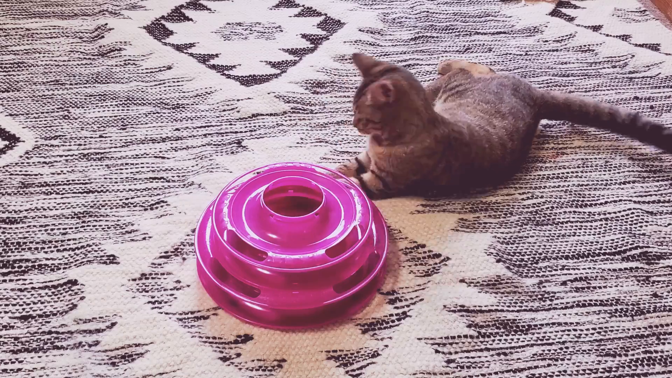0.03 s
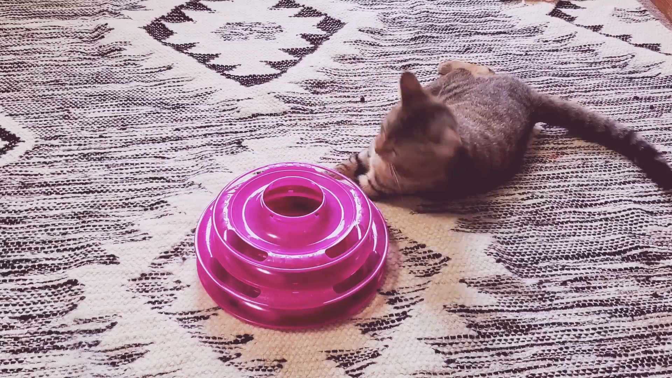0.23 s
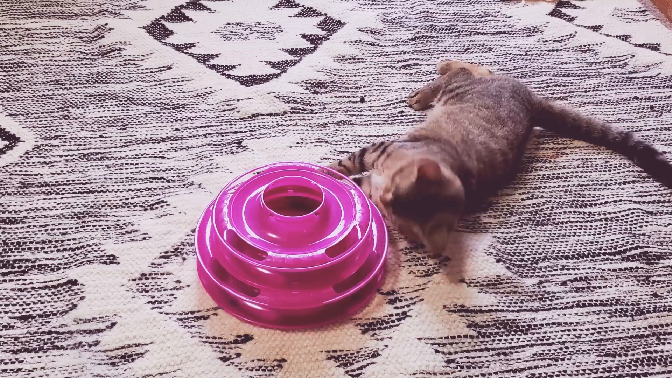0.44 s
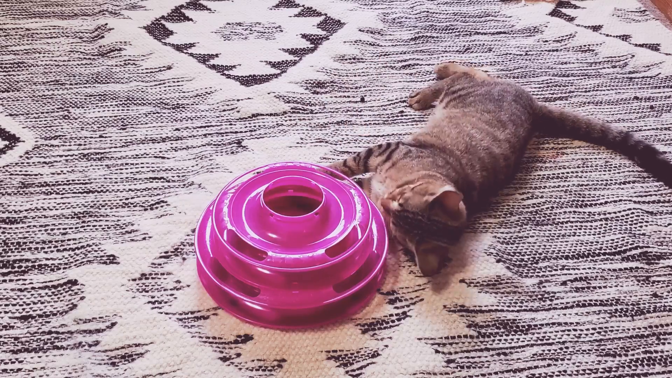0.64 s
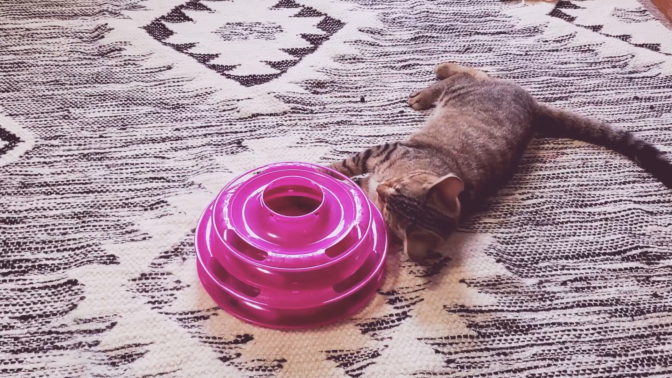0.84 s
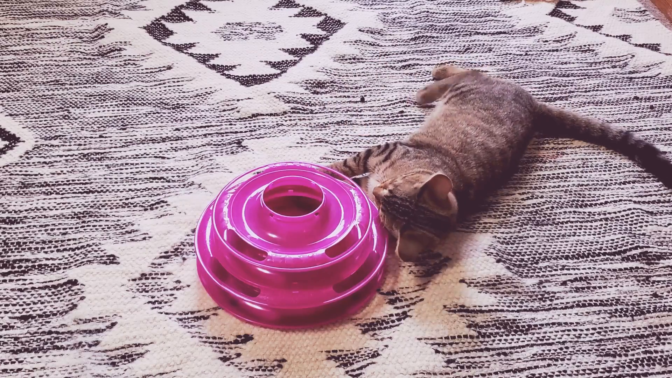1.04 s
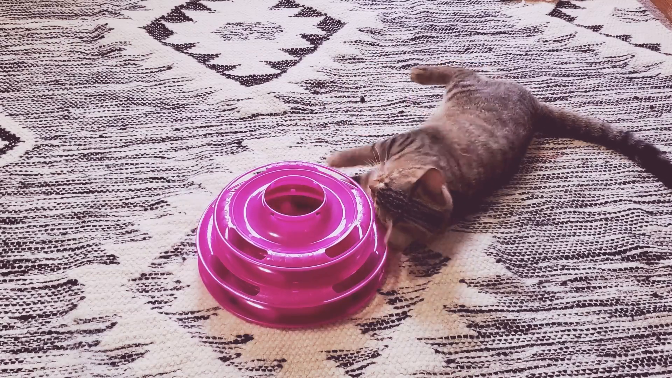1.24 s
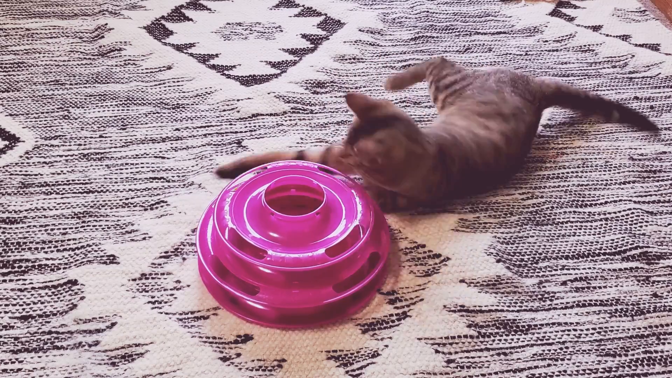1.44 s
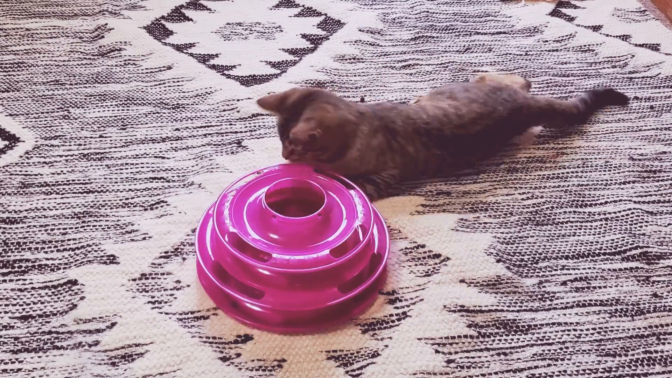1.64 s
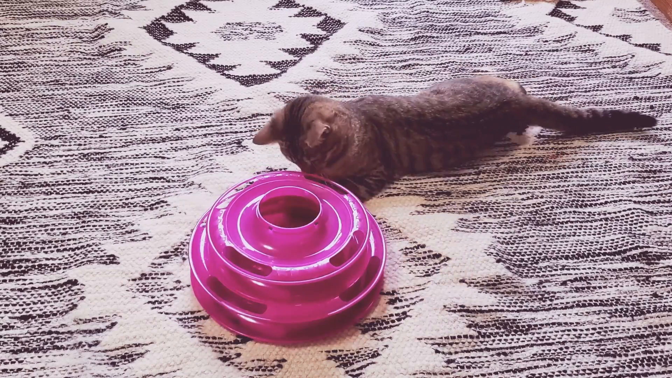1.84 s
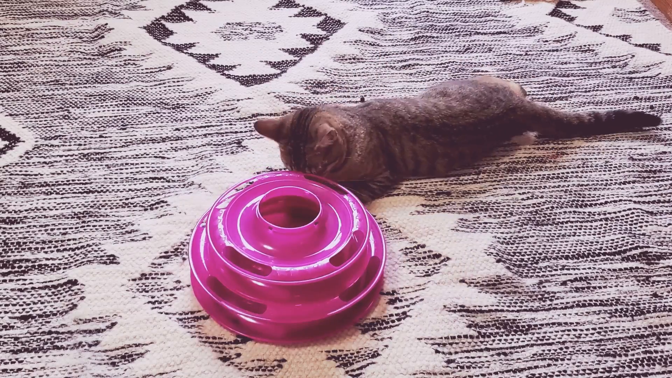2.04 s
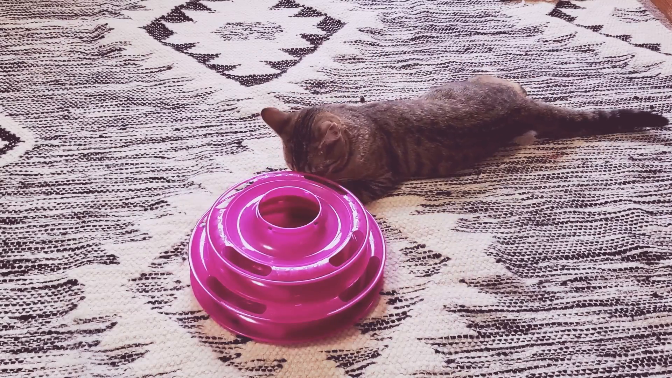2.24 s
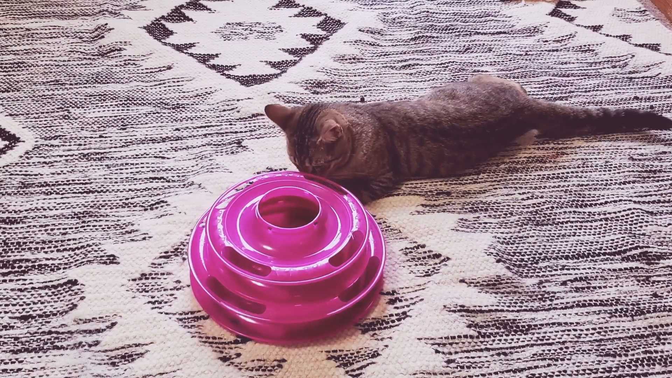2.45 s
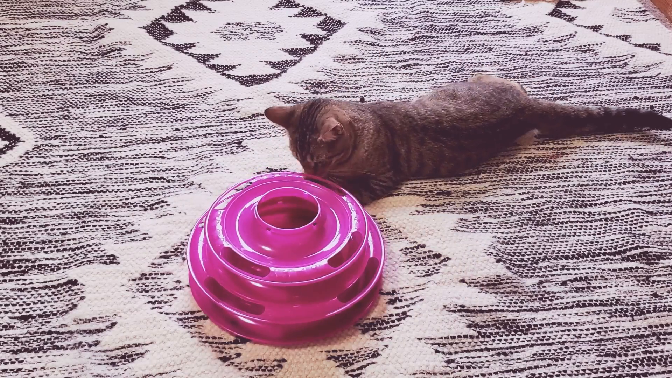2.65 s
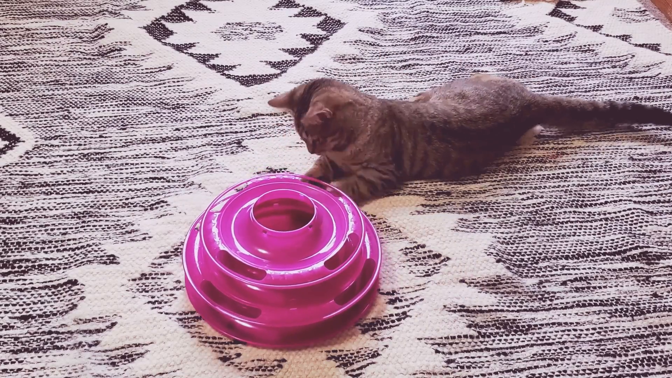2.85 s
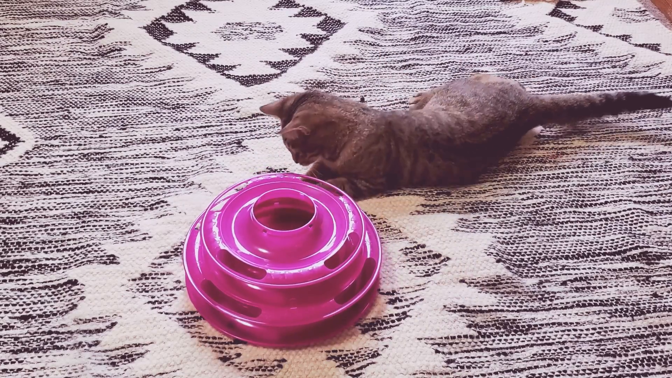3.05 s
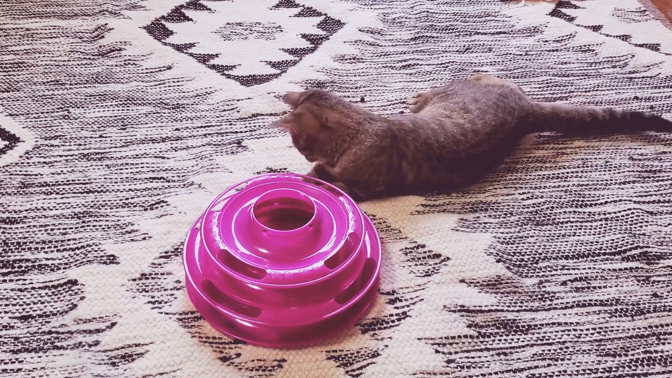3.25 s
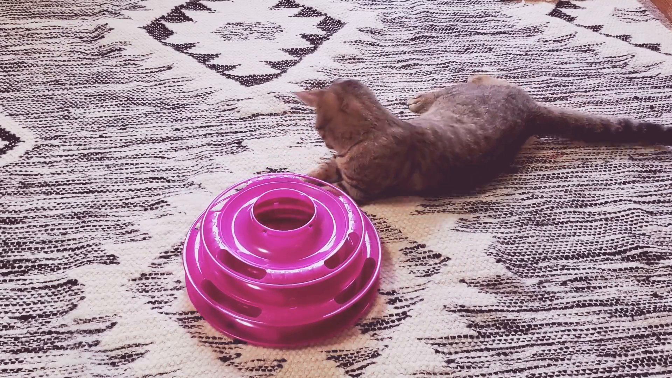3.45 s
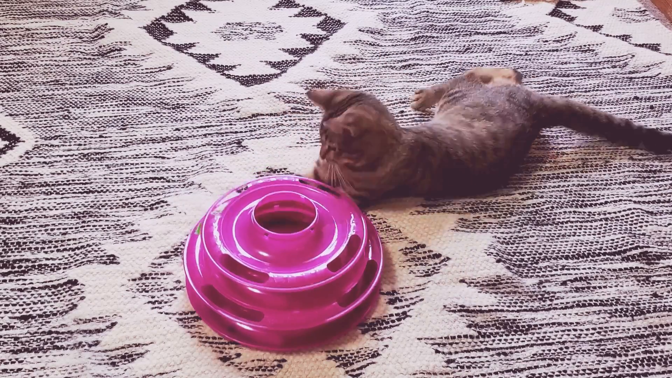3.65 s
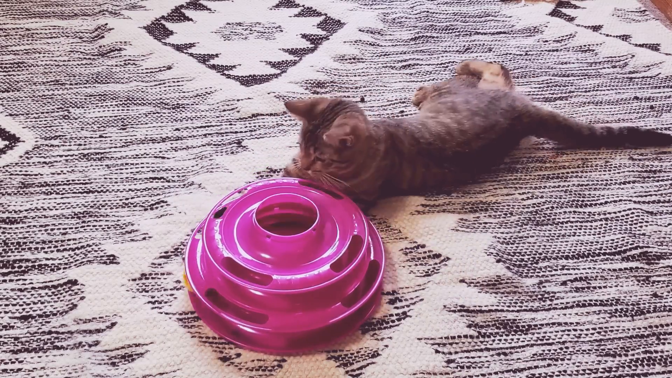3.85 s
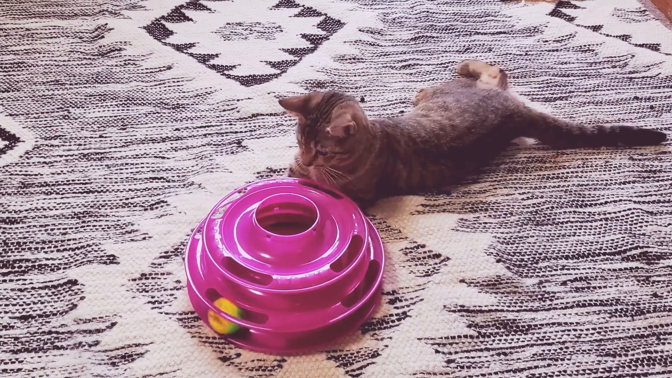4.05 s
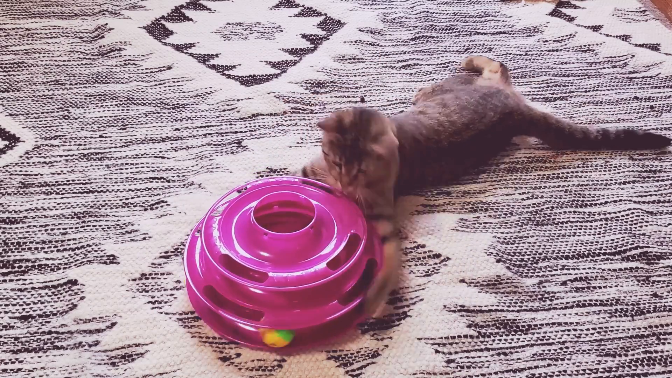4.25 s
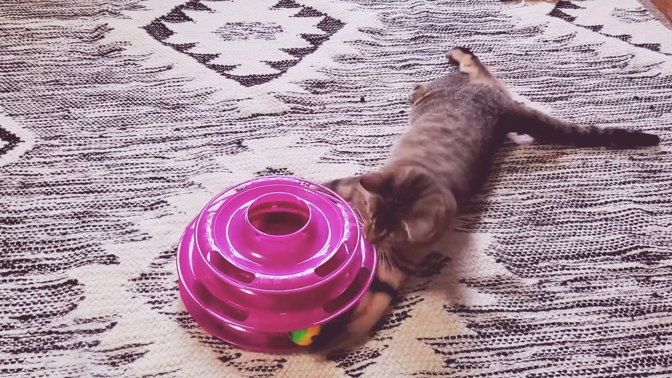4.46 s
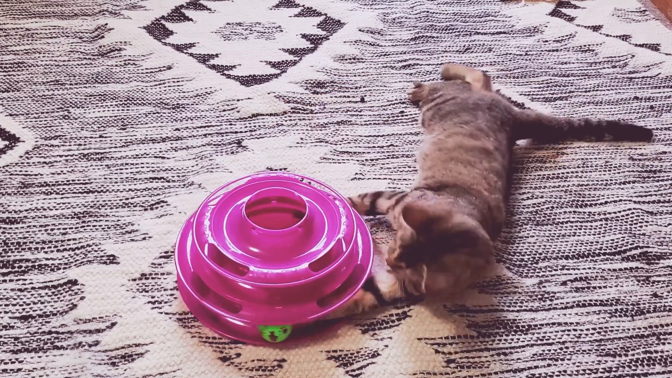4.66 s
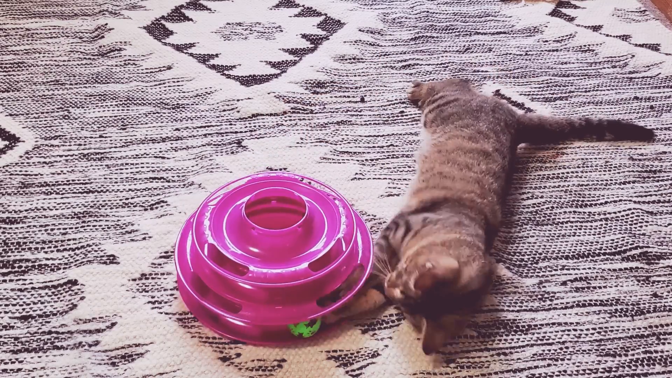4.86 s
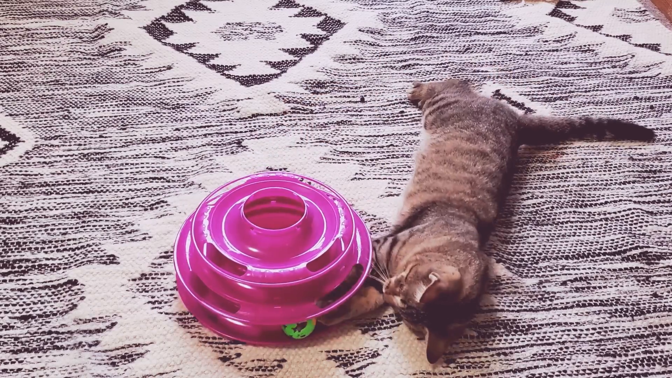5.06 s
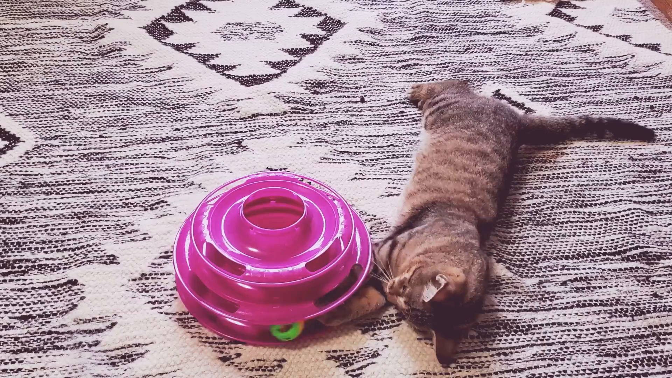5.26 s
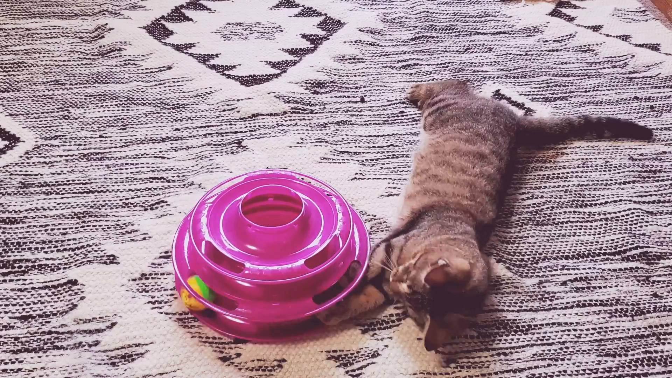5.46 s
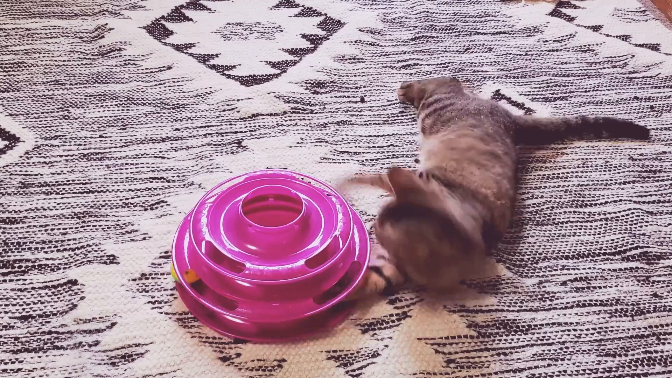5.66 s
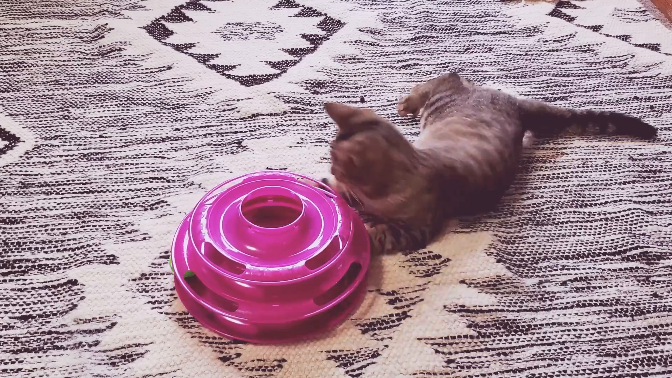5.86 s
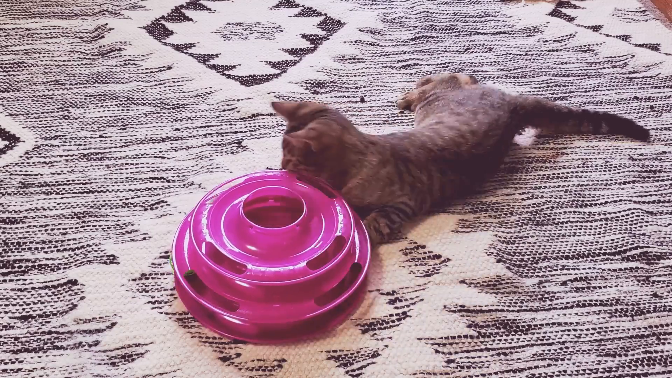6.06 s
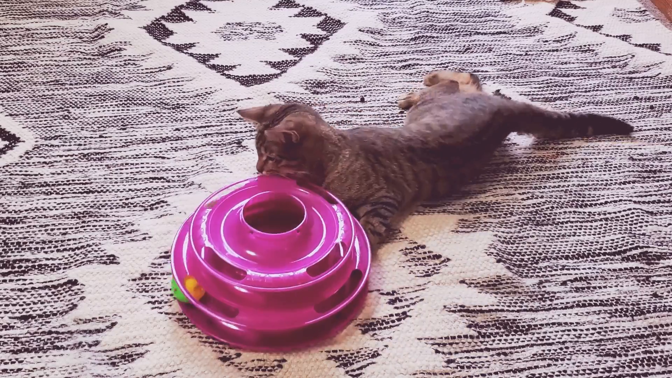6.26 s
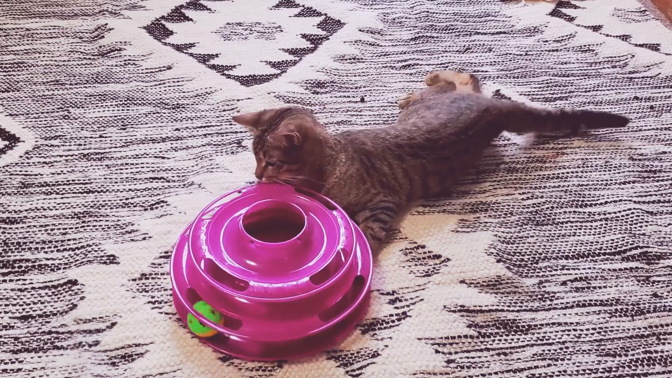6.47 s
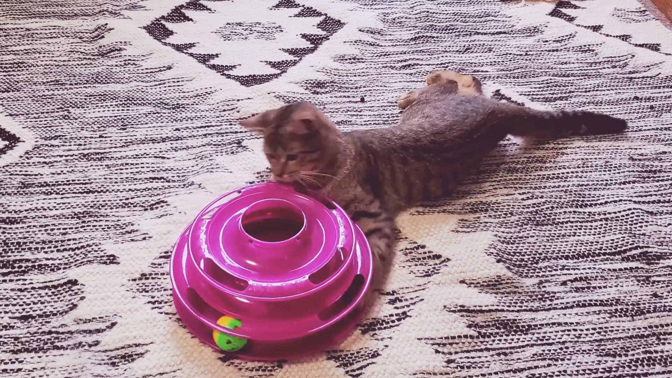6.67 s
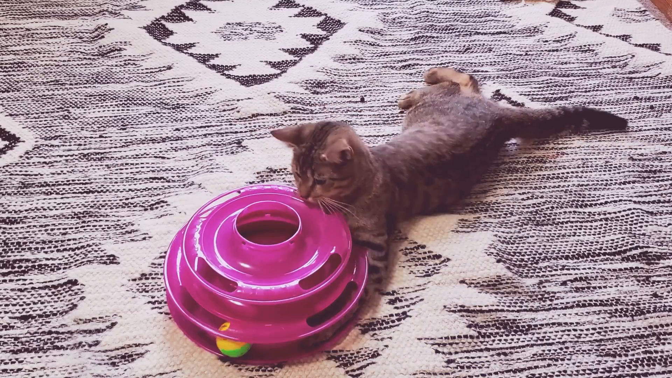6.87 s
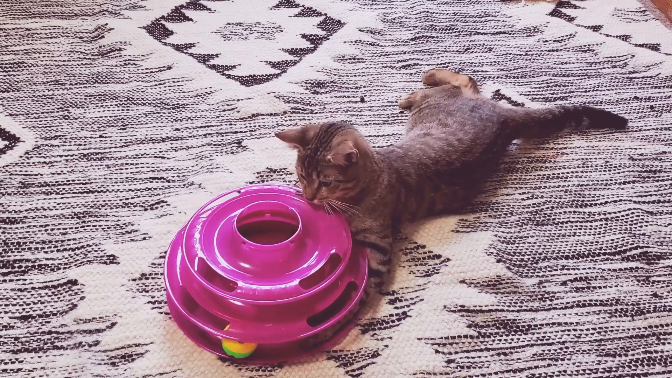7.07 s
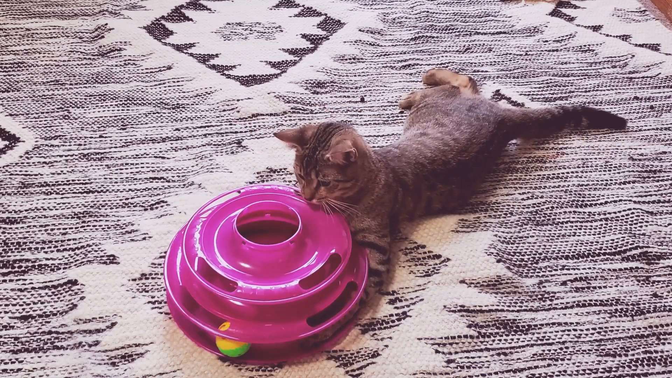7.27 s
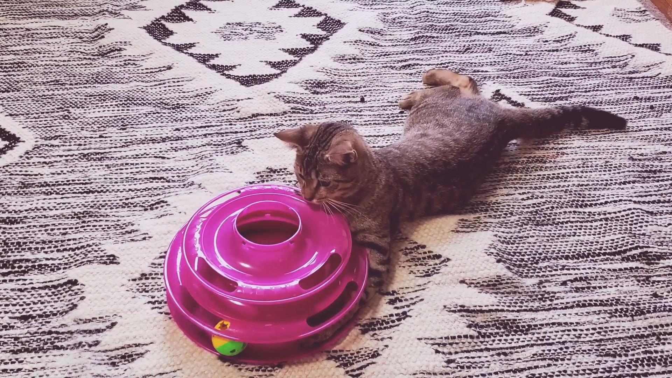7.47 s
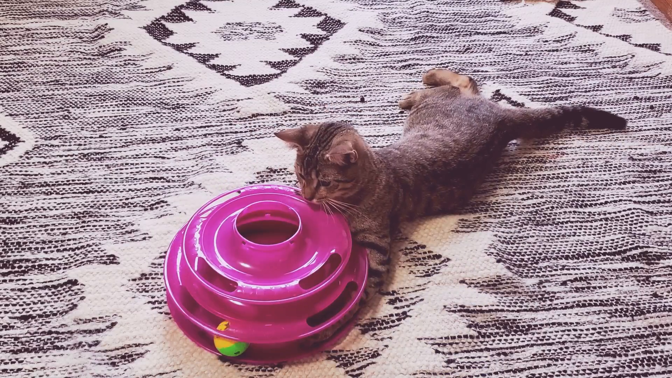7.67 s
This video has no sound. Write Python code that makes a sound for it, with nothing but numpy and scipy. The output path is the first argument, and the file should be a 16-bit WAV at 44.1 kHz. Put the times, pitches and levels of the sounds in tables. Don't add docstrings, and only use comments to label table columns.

```python
import sys
import numpy as np
from scipy import signal
from scipy.fft import rfft, irfft, next_fast_len
from scipy.io import wavfile
from scipy.ndimage import uniform_filter1d, map_coordinates

SR = 44100
rng = np.random.default_rng(int(sys.argv[2]) if len(sys.argv) > 2 else 0)


def gain_from_decibels(decibels):
    exponent = np.asarray(decibels, float) / 20
    return 10 ** exponent


def to_wav(sig):
    pcm = np.clip(np.atleast_2d(sig), -1, 1) * 32767
    pcm = np.round(pcm).astype(np.int16)
    wavfile.write(sys.argv[1], SR, pcm.T)


N = 340452

# (pitch_hz, width_hz, level_db)
TRACK_TONES = [(1400, 200, -8.5), (1820, 730, -13.5), (2580, 40, -5), (2790, 260, -11), (2950, 38, -7),
               (3376, 90, -6.5)]
# (pitch_hz, width_hz, level_db)
TOWER_TONES = [(261, 22, -7.5), (358, 20, -8.5), (428.7, 29, 12.5), (515, 310, 0), (605.5, 23, -1)]
# (pitch_hz,
# level_db)
SHELL_COLOUR = [(2500, -35.5), (3900, -5), (4900, -13.5), (5400, -12.5), (5800, -3.5), (6300, -8.5),
                (7000, -3), (8000, -8.5), (8500, -10.5), (9500, -3), (11200, 0.5), (14600, 2.5),
                (16500, -4)]
# (pitch_hz, width_hz, level_db)
SHELL_TONES = [(5110, 30, 3.5), (6760, 53, 4.5), (7070, 100, 5), (7910, 120, 2.5), (9650, 47, 3.5),
               (10800, 72, 6), (12300, 85, 4)]
# (top_speed_s, low_fizz_db, time_to_stop_s, high_over_low_fizz_db)
RIM_PUSHES = [(.03, -58.5, 0.13, 2), (.17, -74, 0.055, -2), (.215, -70.5, 0.1, 3), (1.245, -59, 0.26, 3.5),
              (1.365, -58, 0.094, 1.5), (1.49, -58.5, 0.09, -0.5), (1.665, -53, 0.27, 1),
              (1.555, -51, 0.079, 1), (1.74, -55, 0.26, -0.5), (2.0, -63, 0.18, 0.5),
              (2.775, -73, 0.12, -2), (2.91, -58, 0.25, -1), (3.0, -70, 0.11, -5), (3.185, -63, 0.11, 4),
              (3.33, -83.5, 0.11, 6), (3.39, -68, 0.12, 1.5), (3.45, -59.5, 0.33, 0), (3.55, -67, 0.3, 11),
              (3.635, -57, 0.18, 3), (3.77, -51.5, 0.21, 4), (3.935, -57.5, 0.61, -1.5),
              (4.06, -53.5, 0.25, 2.5), (4.17, -55, 0.75, 2.5), (4.26, -53.5, 0.55, 3),
              (4.535, -49.5, 0.24, 9.5), (4.68, -54.5, 0.54, 4.5), (4.8, -78.5, 0.48, 17.5),
              (4.94, -60.5, 0.18, 3), (5.13, -74.5, 1, 11), (5.36, -53.5, 0.15, 5.5), (5.52, -56, 0.39, 10),
              (5.71, -62, 0.22, 3.5), (5.795, -57, 0.084, 4), (5.89, -60, 0.19, 5), (5.971, -74.5, 0.3, -1),
              (6.215, -58.5, 0.18, 2.5), (6.33, -62, 0.78, 5), (6.59, -58.5, 0.31, 3),
              (6.77, -64, 0.25, 11), (6.89, -59.5, 0.13, 5)]


def evened(x):
    return x / np.sqrt(np.mean(x ** 2) + 1e-20)


def peaked(x):
    return x / np.abs(x).max()


def read(points, hz):
    f, value = np.transpose(points)
    return np.interp(np.log(hz + 1), np.log(f + 1), value)


def add(mix, s, sound):
    part = mix[round(s * SR):][:len(sound)]
    part += sound[:len(part)]


def coloured(x, gain):
    size = next_fast_len(x.shape[-1])
    spectrum = rfft(x, size) * gain(np.fft.rfftfreq(size, 1 / SR))
    return irfft(spectrum, size)[..., :x.shape[-1]]


def body(x, modes):
    out = 0
    for hz, width, db in modes:
        pole = np.exp((2j * np.pi * hz - np.pi * width) / SR)
        out = out + gain_from_decibels(db) * 2 * signal.lfilter([1 - abs(pole)], [1, -pole], x).real
    return out


def gliding(x, hz, width):
    turn, r = np.exp(2j * np.pi * np.cumsum(hz) / SR), np.exp(-np.pi * width / SR)
    return 2 * (turn * signal.lfilter([1 - r], [1, -r], x / turn)).real


def bumps(per_s, spread_db):
    size = gain_from_decibels(spread_db * np.minimum(rng.exponential(1, N), 4)) * rng.choice([-1, 1], N)
    return size * (rng.random(N) < per_s / SR)


def drift(seconds, shape):
    size = max(round(seconds * SR), 2)
    smooth = uniform_filter1d(rng.standard_normal(shape), size)
    return evened(uniform_filter1d(smooth, size))


def patchy(x, spread_db):
    z = signal.stft(x, nperseg=256)[2]
    field = uniform_filter1d(rng.standard_normal(z.shape), size=4, axis=0)
    field = uniform_filter1d(field, size=14, axis=1)
    return evened(signal.istft(z * gain_from_decibels(spread_db * evened(field)), nperseg=256)[1][:N])


def follow(pushes, second=False):
    speed_up_s, slowing = .05, 1.7
    t = np.arange(0, N / SR + .01, .002)
    s, db, coast_s, over_db = np.transpose(pushes)[:, :, None]
    speed = np.clip(1 - np.maximum(t - s, 0) / coast_s, 0, 1)
    rise_db = -20 * np.minimum(np.maximum(s - t, 0) / speed_up_s, 3) ** 2
    each = gain_from_decibels(db + second * over_db + rise_db) * speed ** slowing
    return np.interp(np.arange(N) / SR, t, np.sqrt((each ** 2).sum(0)))


def panel_hz(t):
    # (start_s, pitch_hz)
    panels = [
        [(0.0, 2880), (0.214, 2910), (0.3, 2690)],
        [(1.2, 3020), (1.384, 2600), (1.504, 2930), (1.57, 2700), (1.64, 2870)],
        [(1.66, 2650), (1.708, 2630), (1.734, 2960), (1.85, 2620), (2.0, 3000), (2.05, 2690), (2.1, 2730)],
        [(2.75, 2780), (2.874, 2720), (2.984, 2700), (3.022, 2930), (3.126, 2790), (3.146, 3020), (3.174, 2650),
         (3.25, 2740)],
        [(3.43, 2980), (3.61, 2950), (3.72, 2700)],
        [(3.74, 2800), (3.882, 2830), (3.9, 2570), (4.082, 2644), (4.108, 2950), (4.148, 3120), (4.18, 2570),
         (4.25, 2890)],
        [(4.27, 2630), (4.35, 2960), (4.404, 2720), (4.446, 2720), (4.694, 3000), (4.754, 2720), (4.866, 2800),
         (5.0, 2700)],
        [(5.33, 2730), (5.4, 3040), (5.52, 2790), (5.544, 2950), (5.602, 2740), (5.702, 2860), (5.76, 2960)],
        [(6.18, 2750), (6.224, 2650), (6.306, 2660), (6.352, 2570), (6.448, 2960), (6.56, 3020)],
        [(6.58, 3040), (6.728, 2780), (6.756, 2580), (6.95, 2820)],
    ]
    return np.interp(t, *np.concatenate(panels).T)


def hush():
    # (pitch_hz, level_db_per_hz)
    hush_colour = [(15, -33.5), (38, -3), (66, 2.5), (124, -16), (250, -18), (330, -22.5), (900, -32),
                   (1500, -27.5), (3000, -34), (4800, -41.5), (8400, -53.5), (10000, -50), (15500, -39)]
    # (pitch_hz, likeness)
    likeness = [(30, 4.5), (60, 0.88), (240, 0.7), (950, -7), (3770, 0.6), (15000, -13)]
    # (pitch_hz, width_hz, level_db)
    house_drones = [(197.9, 17, -86), (261, 23, -88), (550, 36, -105), (795, 30, -100), (1325, 25, -98)]
    a, b = rng.standard_normal((2, N))
    same = lambda f: np.clip(read(likeness, f), 0, 1)
    right = coloured(a, same) + coloured(b, lambda f: np.sqrt(1 - same(f) ** 2))
    bed = evened(coloured(np.array([a, right]), lambda f: gain_from_decibels(read(hush_colour, f))))
    swell = gain_from_decibels(1.3 * drift(.1, N))
    drones = 0
    for hz, width, db in house_drones:
        drones = drones + gain_from_decibels(db + 6.3 * drift(.042, N)) * evened(body(a, [(hz, width, 0)]))
    t = np.arange(N) / SR
    # (level_db, middle_s, half_length_s, pitch_hz, width_hz)
    for db, middle, half, hz, width in ((-79, .5, .37, 555, 9.2), (-80, 7.22, .11, 1340, 38),
                                        (-83, 6.02, .08, 1505, 31)):
        drones = drones + gain_from_decibels(db - 20 * ((t - middle) / half) ** 4) * evened(body(a, [(hz, width, 0)]))
    return gain_from_decibels(-63) * swell * bed + drones


def contacts():
    # (start_s, wall_clack_db, clack_pitch_hz, shell_tick_db)
    clacks = [(6.447, -58, 1580, -44), (1.6547, -26.5, 2570, -29), (1.7261, -24.5, 1680, -38),
              (1.7429, -29.5, 1870, -32), (1.8632, -51.5, 1400, -58), (1.956, -40.5, 1770, -42.5),
              (2.022, -41, 1970, -60), (2.047, -49.5, 2110, -62), (2.1814, -39.5, 2880, -60),
              (1.958, -47, 2950, -42), (2.234, -48.5, 3080, -64), (2.277, -57.5, 1820, -70),
              (3.4415, -45, 1950, -48), (3.6213, -24, 2940, -28), (4.197, -39, 1230, -37),
              (4.3028, -36, 1770, -28), (4.3437, -47, 1920, -39), (4.4627, -26.5, 1700, -26.5),
              (4.5067, -23.5, 2540, -22.5), (4.5355, -24.5, 2100, -23.5), (5.525, -51, 1400, -55.5),
              (5.7728, -16.5, 2660, -20), (6.0865, -58, 2550, -67), (6.1739, -37, 1360, -30),
              (6.2798, -42, 1400, -42.5), (6.3107, -36.5, 1470, -39), (6.5628, -32, 1710, -38.5),
              (6.5734, -39.5, 2270, -35), (6.752, -54.5, 1440, -42.5), (7.2123, -50, 1830, -76),
              (7.34, -51.5, 1810, -55.5), (7.644, -60, 1675, -68.5)]
    # (start_s, wall_clack_db, shell_tick_db)
    rattles = [(.0164, -57, -44), (1.2028, -42, -32), (1.2517, -46, -38), (1.288, -49, -32),
               (1.3134, -49, -32), (1.3584, -40.5, -36.5), (1.4613, -46.5, -42), (1.5344, -40, -32),
               (1.5603, -53, -45), (1.9986, -35, -38.5), (2.7462, -72, -49), (2.9128, -41, -50),
               (2.9856, -45.5, -39.5), (3.5177, -43.5, -37), (3.568, -41, -30), (3.6503, -25.5, -31),
               (3.8138, -45, -29), (3.8501, -44, -36.5), (3.9863, -44, -26), (4.14, -58, -31.5),
               (4.2377, -44, -27), (4.4202, -33, -36.5), (4.6503, -40.5, -32), (4.7035, -46, -35),
               (5.2168, -47.5, -41.5), (5.5834, -47, -34.5), (6.38, -41.5, -52), (6.778, -48, -38),
               (6.8057, -44, -38)]
    # (start_s, wall_clack_db, shell_tick_db)
    skips = [(1.782, -40, -49.5), (1.978, -45, -71), (2.8709, -42.5, -58), (3.1452, -51.5, -58.5),
             (3.1807, -45, -53), (3.7382, -29.5, -53.5), (3.9214, -67, -44), (3.9403, -38.5, -44.5),
             (4.0272, -37.5, -43.5), (4.0545, -41, -43), (4.0832, -35.5, -44.5), (4.1566, -68, -48),
             (4.2747, -34, -39.5), (4.5819, -27, -44.5), (4.616, -39, -57.5), (4.6782, -43, -46),
             (4.7491, -52, -56), (4.9828, -43, -61), (5.3324, -39, -38), (5.3586, -67, -43.5),
             (5.5001, -47.5, -45.5), (5.5267, -67, -41.5), (5.5575, -40, -44), (5.6193, -48, -44),
             (5.9469, -62, -53), (6.5316, -50, -46), (6.609, -40, -63), (6.624, -41, -46.5),
             (6.8573, -48.5, -45.5), (6.921, -54, -51.5)]
    # (start_s, high_tick_db, wall_clack_db)
    bounces = [(0.1538, -69, -67), (0.2076, -62, -60), (1.2314, -46, -60), (1.308, -42, -51),
               (1.4857, -39, -45), (1.504, -32, -62), (1.571, -40, -43.5), (1.7666, -37, -55),
               (1.797, -47, -36), (1.8332, -44, -43), (2.9187, -35.5, -67), (3.0152, -52, -44),
               (3.063, -60, -42), (3.1632, -50.5, -66), (3.4187, -45, -52), (3.5384, -44, -42),
               (3.5994, -34.5, -82), (3.626, -29.5, -63), (3.6345, -34, -43), (3.729, -37.5, -37),
               (3.792, -31.5, -63), (3.8282, -28, -46), (3.8618, -26, -55), (4.1025, -27.5, -54),
               (4.2198, -29, -61), (4.4426, -36, -39.5), (4.5503, -15.5, -59), (4.607, -33.5, -41),
               (4.6638, -28.5, -38), (4.724, -49, -42), (4.7378, -34, -42), (4.782, -34, -52),
               (4.8318, -37, -64), (4.929, -63, -57), (4.9437, -39, -70), (4.9564, -50, -62),
               (5.1657, -50, -66), (5.68, -55, -68), (4.8127, -55, -45.5), (5.125, -64, -60),
               (5.2017, -62, -59.5), (5.3085, -66, -64), (5.628, -52.5, -60), (5.669, -54.5, -62),
               (3.37, -58, -61), (1.918, -62, -61), (2.077, -58, -58), (6.341, -40.5, -50),
               (6.723, -41, -66), (6.3026, -45, -65), (6.43, -53.5, -55), (6.4708, -27, -55),
               (6.506, -32.5, -74), (6.6762, -50, -75), (1.649, -32.5, -44.5), (2.96, -42, -67),
               (3.042, -53, -64), (3.193, -49, -58), (1.348, -48, -48), (4.411, -50, -55), (4, -38.5, -54),
               (5.427, -44, -52)]
    rows = [(s, db, hz, tick, tick - 4) for s, db, hz, tick in clacks]
    light = [(s, db, high - 8) for s, high, db in bounces]
    for table, high_over_db in ((rattles, -8), (skips, 7.5), (light, .5)):
        spread = 1 + .03 * rng.uniform(-0.39, 1, len(table))
        pitches = panel_hz(np.transpose(table)[0]) * spread
        rows += [(s, db, hz, tick, tick + high_over_db) for (s, db, tick), hz in zip(table, pitches)]
    return rows


def shell_tick(noise, spot, t, low_db, high_db):
    fade = gain_from_decibels(-60 * t / .0092) + .066 * gain_from_decibels(-60 * t / .034)
    crack = noise * (1 - np.exp(-t / .0018)) ** 2 * fade
    patches = body(crack, [(f, 900, 6) for f in 4000 + 11000 * spot])
    crack = crack + patches + gain_from_decibels(-2) * body(crack, SHELL_TONES)
    lean_db = lambda f: read([(7800, low_db), (8800, high_db)], f)
    return coloured(peaked(crack), lambda f: gain_from_decibels(read(SHELL_COLOUR, f) + lean_db(f) + 11))


def wall_clack(noise, t, db, hz):
    soft = np.interp(db, [-50, -22], [2.4, 1.1])
    blow = noise * (1 - np.exp(-t / .0008 / soft)) ** 2 * gain_from_decibels(-60 * t / .006 / soft)
    ring = body(blow, [(hz, 520, 0)]) + gain_from_decibels(7) * body(blow, TRACK_TONES)
    clack = body(ring, [(hz, 3200 / soft ** 1.5, 0)])
    clack = clack + body(blow, [(hz * 1.55, 900, -8 - 1.2 * soft)])
    clack = signal.lfilter(*signal.butter(4, .6 * hz, "high", fs=SR), clack)
    return gain_from_decibels(db + 4) * peaked(clack)


def knocks():
    out, t = np.zeros(N), np.arange(3072) / SR
    rows = contacts()
    noise, spots = rng.standard_normal((len(rows), 2, len(t))), rng.random((len(rows), 3))
    for (s, clack_db, hz, low_db, high_db), (a, b), spot in zip(rows, noise, spots):
        tick = shell_tick(a, spot, t, low_db, high_db)
        add(out, s - .0009, tick + wall_clack(b, t, clack_db, hz))
    return out


def rolling():
    # (top_speed_s, ring_db, time_to_stop_s, tower_drone_over_ring_db)
    track_pushes = [(.035, -59, 0.12, -10), (.17, -62.5, 0.065, -13), (.215, -68, .07, -7.5),
                    (1.241, -56.5, 0.19, 1), (1.362, -54.5, 0.14, -22), (1.555, -41.5, 0.051, -15.5),
                    (1.665, -50, 0.24, -5.5), (1.74, -52.5, 0.75, -27), (2.0, -63, 0.11, -6),
                    (2.77, -63.5, 0.042, -10), (2.865, -57.5, .03, -10), (2.9, -64, 0.2, 0.5),
                    (3.03, -59, 0.3, -16), (3.185, -61.5, 0.059, -8.5), (3.4, -69.5, 0.11, -12),
                    (3.47, -48, 0.2, -9), (3.545, -46.5, 0.14, -17), (3.64, -38.5, 0.061, -12.5),
                    (3.765, -44, 0.18, -12), (3.9, -53, 1, -0.5), (4.06, -46.5, 0.17, -17),
                    (4.23, -47.5, 0.35, -13), (4.305, -56, 0.26, -21), (4.535, -38.5, 0.12, -11),
                    (4.7, -62, 0.31, -2), (4.815, -68.5, 0.28, 0), (4.99, -71, 0.054, -0.5),
                    (5.24, -69, 0.29, -1), (5.365, -51.5, 0.55, -7), (5.521, -52, 0.17, -1.5),
                    (5.65, -55.5, 0.063, -5.5), (5.7, -60.5, 0.14, -18), (5.795, -63, 0.12, -18),
                    (5.96, -68.5, 0.3, -5.5), (6.216, -46.5, 0.17, -7.5), (6.33, -50, 0.3, -4),
                    (6.431, -54, 0.48, -6.5), (6.59, -52.5, 0.19, -3.5), (6.79, -57, 0.2, -4.5)]
    wobble = gain_from_decibels(3.2 * drift(.012, (2, N)))
    seams, ring, under = bumps(1500, 7.2), 0, panel_hz(np.arange(N) / SR)
    for hz, width, db in TRACK_TONES:
        lift_db = 8 * np.exp(-((hz - under) / 233) ** 2)
        near = gain_from_decibels(5 * drift(.04, N) + lift_db)
        ring = ring + body(body(near * seams, [(hz, width, db)]), [(hz, 4.9 * width, 0)])
    ring = np.interp(np.arange(N) + 10 * drift(.05, N), np.arange(N), ring)
    ring = ring + gain_from_decibels(9) * gliding(ring, under, 260)
    ring = ring / np.sqrt(uniform_filter1d(ring ** 2, size=6000)) * wobble[0]
    drone = evened(body(body(seams, TOWER_TONES), [(406, 470, 0)]))
    grit = coloured(bumps(4000, 5.2) * wobble[1], lambda f: gain_from_decibels(read(SHELL_COLOUR, f)))
    grit = grit + gain_from_decibels(2) * body(grit, SHELL_TONES)
    low = coloured(grit, lambda f: gain_from_decibels(read([(7800, 0), (8800, -40)], f)))
    out = gain_from_decibels(-2) * ring * follow(track_pushes)
    out = out + gain_from_decibels(-2.5) * drone * follow(track_pushes, second=True)
    out = out + patchy(low, 4.6) * follow(RIM_PUSHES)
    return out + gain_from_decibels(2) * patchy(grit - low, 1.6) * follow(RIM_PUSHES, second=True)


def bell():
    # (start_s, upper_ring_db, lower_ring_db)
    strikes = [(0.155, -52, -72), (.208, -53, -91), (1.743, -55, -57), (2, -61, -66), (2.181, -65, -75),
               (4.759, -53.5, -48), (4.928, -49, -63), (5.333, -38, -60), (1.1099, -65, -86),
               (1.231, -53, -54), (1.835, -39.5, -73), (2.041, -47, -60), (2.208, -64, -66),
               (2.7694, -72, -85), (2.989, -54, -75), (3.186, -46, -60), (3.4511, -61.5, -87),
               (3.85, -39, -62), (4.114, -31, -52), (4.16, -30, -64.5), (4.344, -36, -55),
               (4.5777, -34, -48), (5.5852, -78, -72), (5.9878, -44, -56), (6.448, -42, -79),
               (6.508, -41, -62), (6.557, -41, -52.5), (6.6233, -38, -74), (6.8553, -41, -59)]
    # (pitch_hz, width_hz, level_db)
    upper_tones = [(11548, 12, 0), (11590, 18, -12), (9910, 13, -12), (10210, 20, -16)]
    # (pitch_hz, width_hz, level_db)
    lower_tones = [(5868, 11, 0), (5970, 20, -12), (4940, 12, -4), (5712, 22, -8)]
    tremble = bumps(250, 3) * follow(RIM_PUSHES)
    out = gain_from_decibels(38 + 6 * drift(.05, N)) * body(tremble, lower_tones)
    out = out + gain_from_decibels(30) * body(tremble, upper_tones)
    tap = signal.unit_impulse(SR // 2)
    upper, lower = peaked(body(tap, upper_tones)), peaked(body(tap, lower_tones))
    for s, upper_db, lower_db in strikes:
        add(out, s, gain_from_decibels(upper_db - 3) * upper + gain_from_decibels(lower_db + 8.5) * lower)
    return out


def thuds():
    # (start_s, level_db)
    rocks = [(0.963, -64), (1.201, -50), (1.268, -66), (1.652, -46.5), (1.691, -41), (1.727, -40),
             (2.742, -56.5), (2.87, -45), (3.448, -61.5), (3.617, -48.5), (3.744, -44.5), (4.264, -39),
             (4.303, -37), (4.461, -45), (4.506, -36.5), (4.523, -31), (5.772, -43.5), (6.169, -55),
             (6.302, -38)]
    out, t = np.zeros(N), np.arange(4096) / SR
    for (s, db), push in zip(rocks, rng.standard_normal((len(rocks), len(t)))):
        add(out, s, gain_from_decibels(db + 3) * peaked(body(push * t * np.exp(-t / .0034), TOWER_TONES)))
    return out


def room(x):
    # (pitch_hz, fade_s)
    fade_times = [(300, 0.21), (790, 0.094), (2090, 0.15), (5510, 0.1)]
    taps = np.zeros((2, SR // 2))
    at = np.arange(220, SR // 2 - 20, 20) + rng.integers(0, 20, (2, (SR // 2 - 221) // 20))
    np.put_along_axis(taps, at, rng.choice([-1., 1.], at.shape), 1)
    hz, t, z = signal.stft(taps, SR, nperseg=128)
    tail = signal.istft(z * gain_from_decibels(-60 * t / read(fade_times, hz)[:, None]), SR, nperseg=128)[1]
    f = np.fft.rfftfreq(tail.shape[1], 1 / SR)
    apart = np.clip(read([(300, .62), (1300, .62), (2400, .97)], f), 0, 1)
    left, right = rfft(tail)
    tail = irfft([left, apart * right + np.sqrt(1 - apart ** 2) * left], tail.shape[1])
    return signal.fftconvolve(x[None], tail / np.linalg.norm(tail[0]), axes=1)[:, :N]


def ports(x, lag_s):
    # (pitch_hz, left_minus_right_db)
    left_over_right = [(200, 0), (1300, .6), (2400, -1.5), (4400, -4), (8100, -2.2), (15000, -2.5)]
    late = lambda f: np.exp(-2j * np.pi * f * lag_s * np.clip(f / 3500, 0, 1))
    left = coloured(x, lambda f: gain_from_decibels(read(left_over_right, f) / 2))
    right = coloured(x, lambda f: gain_from_decibels(-read(left_over_right, f) / 2) * late(f))
    moving = np.arange(N) + 5e-5 * SR * drift(.09, N)
    return np.array([left, map_coordinates(right, [moving], order=3)])


def masked(x, under_db):
    hz, _, z = signal.stft(x, SR, nperseg=1024)
    bands = (abs(z[:, :512]) ** 2).mean(0).reshape(128, 4, -1).max(1)
    bands = uniform_filter1d(bands, size=2, axis=1)
    luck = rng.standard_normal((128, bands.shape[1] // 3 + 1))
    luck_db = 3.6 * np.repeat(luck, 3, axis=1)[:, :bands.shape[1]]
    limit_db = read(under_db, hz[2:512:4])[:, None] + luck_db
    weak = bands < bands[12:92].mean(0) / gain_from_decibels(2 * limit_db)
    treble = (hz[:512] > 2100) & (hz[:512] < 10800)
    weak = np.repeat(weak, 4, axis=0) & treble[:, None]
    z[:, :512] *= np.where(weak, .006, 1)
    return signal.istft(z, SR, nperseg=1024)[1][:, :N]


def scene():
    struck, rolled = knocks() + thuds(), rolling() + bell()
    wet = room(gain_from_decibels(-5) * struck + gain_from_decibels(-3.5) * rolled)
    return ports(struck + rolled, 7e-5) + wet + hush()


def top_cut(x):
    return signal.sosfilt(signal.butter(12, 16960, fs=SR, output="sos"), x)


def record(dry):
    # (pitch_hz, level_db)
    top_fade = [(15700, 0), (16000, -30), (16900, -32)]
    faded = coloured(dry, lambda f: gain_from_decibels(read(top_fade, f)))
    mix = masked(faded, [(2200, 19), (3500, 13), (4400, 11), (5400, 10), (6600, 12), (7500, 15),
                         (8500, 13), (10000, 19)])
    return top_cut(mix)


dry = scene()
out = record(dry)
to_wav(out)
```